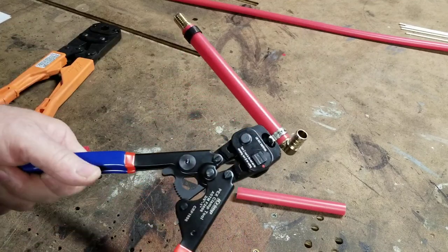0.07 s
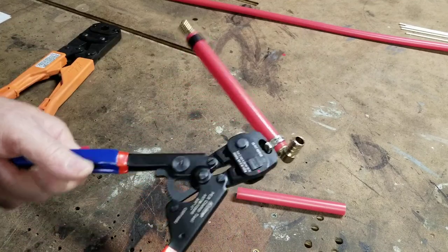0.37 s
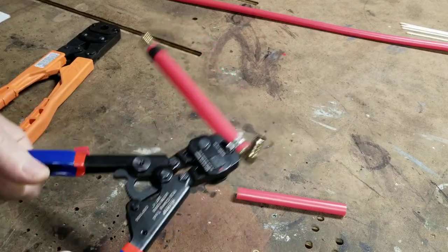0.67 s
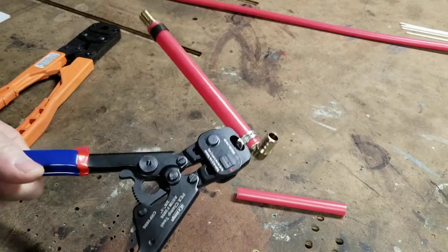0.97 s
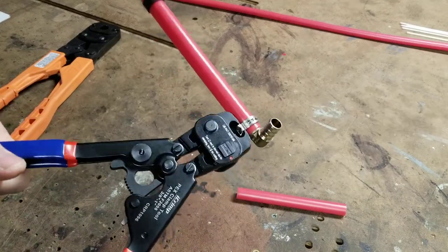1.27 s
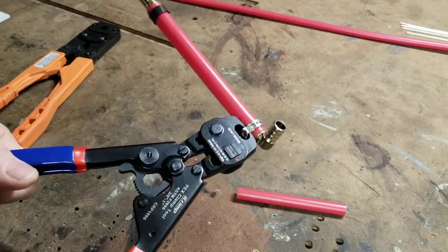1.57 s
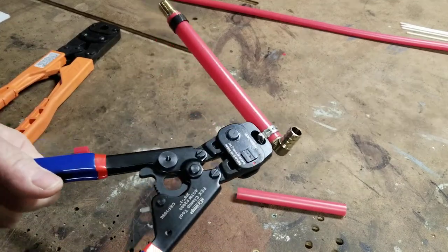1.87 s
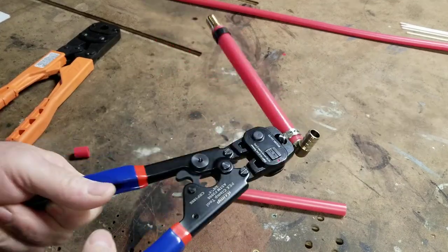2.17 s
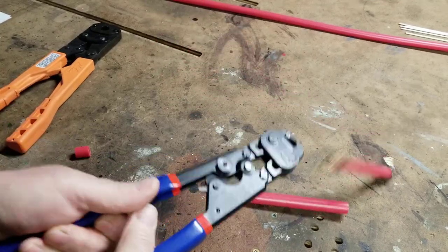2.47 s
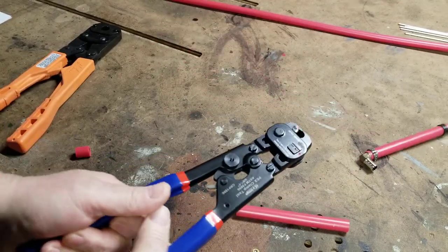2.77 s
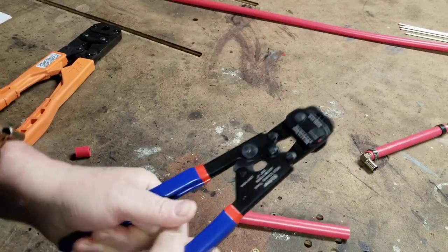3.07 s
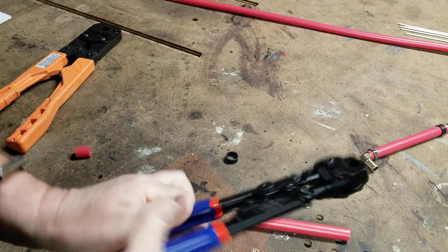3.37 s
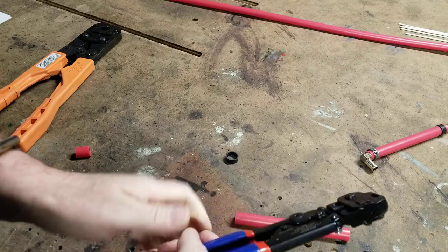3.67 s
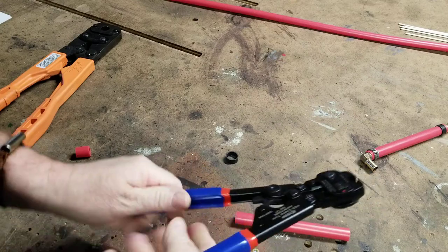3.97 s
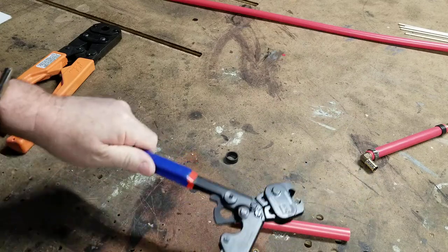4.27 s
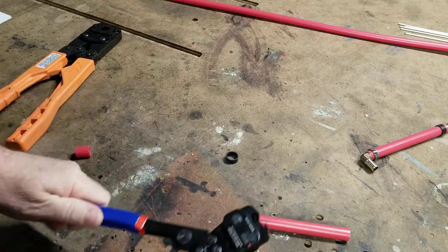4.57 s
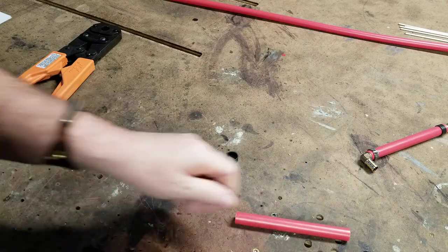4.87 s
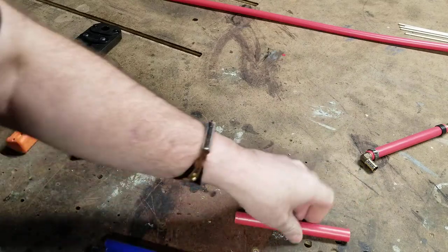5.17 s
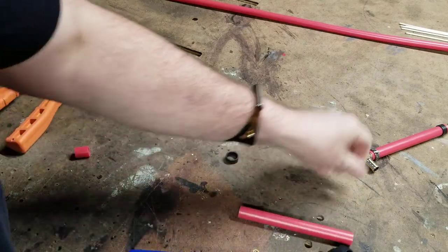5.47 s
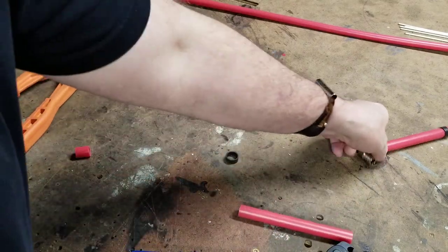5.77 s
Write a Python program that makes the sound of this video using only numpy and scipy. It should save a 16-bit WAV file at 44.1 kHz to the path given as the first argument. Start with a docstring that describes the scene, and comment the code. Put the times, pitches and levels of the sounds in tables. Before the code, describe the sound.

A crimp tool snaps sharply, a plastic pipe drops and bounces on a wooden workbench, then the handles ratchet open.

```python
"""A plastic pipe scrapes on a wooden workbench, close to a stereo pair of microphones in a small workshop.
A crimp tool's links tick; its pawl and jaws snap, ringing the frame, and a steel ring tears off the pipe.
The pipe drops and bounces, sounding the bench top and its own brass fitting. The handles ratchet open,
the tool is put down, and a hand knocks on the bench and takes up the pipe. Nearby walls and shelves
echo each contact over quiet room tone."""
import sys
import numpy as np
from scipy import signal
from scipy.fft import rfft, irfft, next_fast_len
from scipy.io import wavfile

SR = 44100
rng = np.random.default_rng(int(sys.argv[2]) if len(sys.argv) > 2 else 0)


def materialize(psi):
    """Save the field psi as 16-bit PCM at rate SR to the path in sys.argv[1].

    A 1-D psi becomes a single channel; in a 2-D psi each row is a channel.
    """
    bounded = np.clip(np.atleast_2d(psi).T, -1, 1)
    quanta = np.round(bounded * 32767).astype(np.int16)
    wavfile.write(sys.argv[1], SR, quanta)


N = 266011
TIME = np.arange(N) / SR

# Room tone, spectra of still air and low rumble: freq_hz, level_db
AIR_COLOUR = [(15, -38.5), (25, -19.5), (53, -1), (80, -2), (887, -21), (1610, -23.5), (3250, -31),
              (4490, -25.5), (5430, -33.5), (7310, -29), (8590, -39.5), (13200, -26.5), (16000, -35.5)]
RUMBLE_COLOUR = [(20, -10), (40, -6), (62, 8.5), (100, 1.5), (170, -16), (300, -33.5), (800, -43),
                 (3000, -68)]
# Rise and fall of the rumble: time_s, relative_db
RUMBLE_LEVEL = [(0.0, -60), (0.54, -60.5), (2.77, -64), (3.06, -73.5), (4.64, -69), (5.17, -64.5),
                (5.39, -50.5), (6.03, -65.5)]
# Hands, pipe and handles sliding: peak_s, level_db, half_length_s
SWISHES = [(0.458, -50.5, .085), (0.655, -66.5, 0.26), (1.1, -70, 1.4), (0.919, -53.5, 0.081),
           (1.284, -56, 0.042), (1.441, -58, 0.03), (1.608, -63.5, 0.046), (1.786, -61, 0.033),
           (1.922, -60, 0.06), (3.087, -60, 0.14), (3.339, -61.5, 0.077), (3.498, -70.5, 0.074),
           (3.876, -61, 0.1), (5.236, -70.5, 0.23), (5.7, -63.5, 0.16)]
# Spectrum of that sliding: freq_hz, level_db
RUB_COLOUR = [(200, -11.5), (1000, -10.5), (1600, 0.5), (2800, -11), (5000, 0.5), (7300, 3), (9000, -6.5),
              (12500, 5), (16000, 6)]
# Plastic and steel scraping: start_s, length_s, level_db, from_hz, to_hz
SCRAPES = [(0.395, 0.052, -46.5, 1550, 1124), (0.465, 0.24, -64.5, 1130, 1480),
           (0.573, .012, -63, 4320, 4430), (0.738, 0.23, -70.5, 1680, 1795), (0.93, 0.056, -58, 1700, 1850),
           (1.77, 0.057, -68.5, 1500, 1486), (5.71, 0.052, -56, 1400, 1430),
           (5.953, 0.12, -76.5, 2900, 2870)]
# Ticks of the loose linkage: start_s, relative_db, length_s, tilt_db_per_octave
TICKS = [(0.401, -25, 0.0017, -5), (0.694, -17.5, 0.0015, 3.5), (3.181, -26, 0.0014, -2.5),
         (3.266, -23.5, 0.01, -1.5), (3.279, -24, 0.0033, -3.5), (3.4875, -12, 0.00043, 0),
         (3.6135, -12, 0.0068, 0.5), (3.63, -28, 0.0058, -2.5), (4.104, -4.5, 0.0046, -1),
         (4.206, -17, 0.0025, 11), (4.357, -1, 0.006, 2.5), (4.38, -11.5, .002, 12),
         (4.4515, -8.5, 0.0046, 1.5), (4.515, -20.5, 0.0019, -1)]
# Spectrum of a tick before its tilt: freq_hz, level_db
TICK_COLOUR = [(100, -12), (1200, -16), (3000, -2), (7000, 7.5), (8800, 1.5), (12000, 3.5), (16000, -0.5)]
# Resonances of the links: pitch_hz, level_db, t60_s
LINK_MODES = [(2900, 3, .006), (4750, 0, .005), (6550, -2, .006)]
# Pipe, tool and hand striking the bench: start_s, level_db, contact_hz, treble_db_per_octave, room_db
BLOWS = [(0.416, -12, 1320, 0, -3), (.457, -23, 754, -4, -14), (0.5705, -27.5, 1400, -8, -28),
         (.694, -29, 1430, -20, -4), (.835, -30, 513, -2.5, -10), (2.098, -29.5, 1770, -13, -9),
         (2.448, 2, 1040, 0, 4.5), (2.4524, 10, 239, -3, -10), (2.666, -3.5, 700, -4, -2.5),
         (2.7174, 7, 305, 3.5, 4), (2.7256, 11.5, 1140, -20.5, -2.5), (2.798, -2, 1283, -2, -2.5),
         (4.107, -14.5, 850, 5, -15), (4.8247, -16.5, 1403, -11, -13), (4.8255, -5.5, 290, -6.5, 0.5),
         (5.177, -8, 156.3, -3.5, -21.5), (5.18, -33, 1915, -16.5, -6), (5.188, -6.5, 98, -3, -4.5),
         (5.227, -7, 150, -3.5, 0), (5.231, -28, 2000, -14, -13), (5.29, -0.5, 62, -9, -10),
         (5.317, -24, 1850, -4, -4.5), (5.326, -6.5, 170, -3, -2.5), (5.559, -7, 1520, -13.5, -11),
         (5.5599, 6, 354, -7, 2), (5.795, -20, 1214, -21, -4), (5.951, -26.5, 980, -13, 4)]
# Main resonances of the bench top: pitch_hz, level_db, t60_s
BENCH_MODES = [(62, -7, 0.39), (95.7, -9.5, 0.17), (111, -1, 0.15), (190, -10.5, 0.1), (276.4, -1, 0.33),
               (283.6, 1, 0.12), (379, -17.5, 0.032), (416, -9.5, 0.13), (724, -11.5, .04),
               (986, -10, 0.028), (1630, -28, 0.063)]
# Spectrum of its many small modes: freq_hz, level_db
BENCH_COLOUR = [(35, -16), (70, 3.5), (130, 1), (265, 2.5), (420, -1.5), (750, -8), (1100, -11),
                (1700, -11.5), (2600, -17.5), (4000, -25), (5500, -22), (7400, -18), (9000, -28),
                (16000, -23)]
# Their decay: freq_hz, t60_s
BENCH_T60 = [(100, 0.68), (400, 0.17), (1500, 0.025), (5000, 0.038), (14000, 0.022)]
# Spectrum of the workshop's echoes: freq_hz, level_db
ROOM_COLOUR = [(50, 0), (200, -8), (600, -3), (3000, 2.5), (5000, 3.5), (6700, -3), (9000, 1), (12000, 3.5),
               (16000, -3.5)]
# Their decay: freq_hz, t60_s
ROOM_T60 = [(100, 0.21), (400, 0.69), (1200, 0.39), (3000, 0.48), (7000, 0.42), (14000, 0.19)]
# Snaps of pawl and jaws: start_s, relative_db
SNAPS = [(1.9244, 7), (1.946, 6), (1.9631, 4.5), (1.9839, 8), (2.2105, 3.5), (2.2332, 6), (2.2424, 6),
         (2.2471, 4), (3.9189, 3.5), (3.9373, 1.5), (3.9576, -5.5), (3.9847, -4), (4.0111, 3), (4.0277, 4),
         (4.0395, -1.5), (4.0487, -6), (4.0575, -6), (4.0645, -8.5), (4.3567, -15)]
# Handle strokes (jaws bite, jaws slip, ring tears, handles open, loose handle hits its stop):
# start_s, frame_hz, frame_db, steel_db, recoil_db, relative_room_db
STROKES = [(1.9, 2380, -10, -10, -19.5, -1), (2.2, 2413, -7.5, -10.5, -21, 2),
           (2.24, 2400, -7, -20, -16.5, 5), (3.9, 3200, -6, -31.5, -15, -1.5),
           (4.3, 2930, -2, -22, -34, -0.5)]
# Spectrum of a snap's crack: freq_hz, level_db
STEEL_COLOUR = [(100, -24.5), (400, -26.5), (1200, -28), (2200, -11.5), (4400, 0.5), (5400, -2.5),
                (6200, 4), (7100, 6), (8300, -8), (10500, -3.5), (12200, -1.5), (14000, 0), (16000, -5.5)]
# Strikes on the brass fitting at the pipe's end: start_s, level_db
CLINKS = [(2.4478, 3), (2.7175, -6.5)]
# Resonances of the fitting: pitch_hz, level_db, t60_s
FITTING_MODES = [(1536, -0.5, 0.0082), (2100, -11, 0.02), (3900, -5.5, 0.012), (4700, -0.5, 0.0091),
                 (6316, -12.5, .008)]
# Likeness of diffuse sound at the two microphones: freq_hz, correlation
MIC_LIKENESS = [(60, .93), (280, 0.96), (600, 0.54), (1200, 0), (16000, 0.024)]
# The right microphone against the left: freq_hz, gain_db
RIGHT_MIC_COLOUR = [(100, -2.5), (300, -4.5), (650, -6.5), (1300, -5.5), (2800, 0), (5500, -3), (9500, -1),
                    (14000, -0.5)]


def from_db(db):
    """Decibels to gain."""
    return 10 ** (np.asarray(db) / 20)


def unit(x):
    """Scale to an energy of one per channel."""
    return x / np.sqrt(np.sum(x ** 2, axis=-1, keepdims=True) + 1e-20)


def at_hz(points, hz):
    """Read a table on a log-frequency axis."""
    freqs, values = np.transpose(points)
    return np.interp(np.log(np.maximum(hz, 1)), np.log(freqs), values)


def coloured(x, spectrum):
    """Causal (minimum-phase) filter with the given spectrum."""
    n = 2 * next_fast_len(x.shape[-1] * 2 // 3 + 1)
    gain = from_db(at_hz(spectrum, np.fft.rfftfreq(n, 1 / SR)))
    cepstrum = irfft(np.log(gain), n)
    cepstrum[1:n // 2] *= 2
    cepstrum[n // 2 + 1:] = 0
    return irfft(rfft(x, n) * np.exp(rfft(cepstrum)), n)[..., :x.shape[-1]]


def diffuse(size):
    """White noise at both microphones, alike in the bass and unrelated in the treble."""
    n = next_fast_len(size)
    alike = np.clip(at_hz(MIC_LIKENESS, np.fft.rfftfreq(n, 1 / SR)), -1, 1)
    mid, side = rfft(rng.standard_normal((2, n)))
    pair = np.sqrt((1 + alike) / 2) * mid + np.sqrt((1 - alike) / 2) * side * [[1], [-1]]
    return irfft(pair, n)[:, :size]


def steady(spectrum):
    """Coloured stereo noise of rms one."""
    return unit(coloured(diffuse(N), spectrum)) * np.sqrt(N)


def dense_modes(t60_table, size):
    """Countless close modes: stereo noise that dies at its own rate in each octave."""
    t, hz = np.arange(size) / SR, np.fft.rfftfreq(size, 1 / SR)
    noise, out = rfft(diffuse(size)), 0
    centres = np.geomspace(62.5, 16000, 9)
    for centre, pick in zip(centres, np.eye(len(centres))):
        share = np.interp(hz, centres, pick)
        band = irfft(noise * share, size) * from_db(-60 * t / at_hz(t60_table, centre))
        out = out + unit(band) * np.sqrt(share.mean())
    return unit(out)


def mode(hz, t60, size):
    """One decaying sine of unit energy."""
    t = np.arange(size) / SR
    return unit(np.sin(2 * np.pi * hz * t) * from_db(-60 * t / t60))


def crack(length_s, size):
    """Slipping over an edge: a burst of tiny contacts that swells and dies, even in spectrum."""
    t = np.arange(size) / SR / max(length_s, 1e-4)
    swell = t * np.exp(-np.pi * t)
    spectrum = rfft(rng.standard_normal((2, size)) * swell)
    even = irfft(spectrum / (np.abs(spectrum) + 1e-12), size)
    return unit(even * np.sqrt(swell))


def rung(burst, modes):
    """Resonances set ringing by a burst, at unit energy."""
    return unit(signal.fftconvolve(burst, modes[None])[:, :len(modes)])


def stick_slip(spread_db, count):
    """Surfaces catch and let go: a gain that wanders through random values."""
    times = np.linspace(0, TIME[-1], count)
    return from_db(spread_db * np.interp(TIME, times, rng.standard_normal(count)))


def add(track, start_s, sound):
    """Mix a sound in at a time."""
    i = round(start_s * SR)
    track[:, i:i + sound.shape[-1]] += sound[..., :N - i]


def placed(x, left_db, lag_s=0):
    """A source to the left is louder in the left microphone and may reach the right one later."""
    right = np.interp(TIME - lag_s, TIME, x[1])
    return np.array([x[0] * from_db(left_db / 2), right * from_db(-left_db / 2)])


def room_tone(air_db=-69.5):
    """Still air and a low rumble that slowly sinks and swells."""
    rumble_db = 1.5 + np.interp(TIME, *np.transpose(RUMBLE_LEVEL))
    rumble = from_db(rumble_db) * steady(RUMBLE_COLOUR)
    return placed(rumble, left_db=0.5) + from_db(air_db) * steady(AIR_COLOUR)


def rubbing():
    """Left of centre, a grainy hiss of skin and plastic sliding swells with each small move."""
    moves = sum(from_db(db) * np.exp(-((TIME - peak_s) / half_s) ** 2) for peak_s, db, half_s in SWISHES)
    return placed(moves * stick_slip(1.9, count=2400) * steady(RUB_COLOUR), left_db=6.5)


def scraping(width_hz=300, attack_s=0.009, release_s=0.023, sag_db=-7, grit_db=-3.5):
    """Well to the left, each scrape excites broad grit and a resonance that glides with the contact."""
    lowpass = signal.butter(2, width_hz / 2, fs=SR, output="sos")
    narrow = unit(signal.sosfilt(lowpass, rng.standard_normal((2, N))))
    grit = steady([(150, -7), (500, -7), (1500, 14), (3000, 11.5), (7000, 16), (16000, -23)])
    out = 0
    for start_s, length_s, level_db, from_hz, to_hz in SCRAPES:
        age = TIME - start_s
        progress = np.clip(age / length_s, 0, 1)
        pressed = np.clip(age / attack_s, 0, 1) * np.clip(1 - (age - length_s) / release_s, 0, 1)
        gain = pressed * from_db(level_db + sag_db * progress)  # the pressure eases
        hz = from_hz + (to_hz - from_hz) * progress
        resonance = narrow * np.cos(2 * np.pi * np.cumsum(hz) / SR) * np.sqrt(2 * N)
        out = out + gain * (resonance + from_db(grit_db) * grit)
    return placed(out * stick_slip(5.2, count=900), left_db=9.5)


def linkage_ticks(room_db=-8.5, size=4096):
    """Loose links and the pawl tick as the tool moves; duller contacts move more metal and ring more."""
    direct = np.zeros((2, N))
    for start_s, level_db, length_s, tilt in TICKS:
        colour = [(hz, db + tilt * np.log2(hz / 1000)) for hz, db in TICK_COLOUR]
        burst = crack(length_s, size)
        # the resonances shift as the links change position
        links = sum(from_db(db) * mode(hz * rng.uniform(0.92, 1.08), t60, size)
                    for hz, db, t60 in LINK_MODES)
        ringing = from_db(-10 - 2.5 * tilt) * rung(burst, links)
        tick = unit(unit(coloured(burst, colour)) + ringing)
        add(direct, start_s, from_db(level_db - 3) * tick)
    return placed(direct, left_db=2), from_db(room_db) * direct


def bench_blows(bass_db_per_octave=-6, size=12288):
    """Blows ring the bench top, just right of centre; soft, long contacts give bass, hard edges treble."""
    direct, to_room = np.zeros((2, 2, N))
    # the room receives all directions at once, so the small modes blend into a smooth spectrum
    blended = unit(coloured(signal.unit_impulse(size), BENCH_COLOUR))
    for start_s, level_db, contact_hz, treble_slope, room_db in BLOWS:
        main = unit(sum(from_db(db + rng.normal(0, 1)) * (-1) ** k * mode(hz, t60, size)
                        for k, (hz, db, t60) in enumerate(BENCH_MODES)))
        small = dense_modes(BENCH_T60, size) + from_db(-6) * crack(0.0016, size)[0]
        small = unit(coloured(small, BENCH_COLOUR))
        contact = [(contact_hz / 16, 4 * bass_db_per_octave), (contact_hz, 0),
                   (6000, treble_slope * np.log2(6000 / contact_hz))]
        # the contact favours one resonance at its own pitch, for about ten cycles
        favoured = from_db(-5) * mode(contact_hz, 10 / contact_hz, size)
        for track, body, path_db in [(direct, small, 0), (to_room, blended, room_db)]:
            wood = unit(coloured(body + from_db(-8) * main, contact))
            add(track, start_s, from_db(level_db + path_db) * unit(wood + favoured))
    return placed(direct, left_db=-2.5), to_room


def workshop_echoes(to_room, first_echo_s=0.0042, build_up_s=0.0046, shift_hz=11, patterns=3, size=SR):
    """Echoes from nearby shelves and walls thicken and die, the top treble first; a faint tail lingers."""
    t, out = np.arange(size) / SR, 0
    onset = np.clip((t - first_echo_s) / build_up_s, 0, 1) + 0.18
    tail = from_db(-16.5) * dense_modes([(200, 3.9), (1200, 1.3), (5000, 0.66), (14000, 0.5)], size)
    for k in range(patterns):
        # each contact radiates its own way, so the echo pattern keeps changing, at constant power
        share = np.sqrt(2 / patterns) * np.cos(np.pi * (shift_hz * TIME + k / patterns))
        response = coloured(unit((dense_modes(ROOM_T60, size) + tail) * onset), ROOM_COLOUR)
        out = out + signal.fftconvolve(to_room[:1] * share, response, axes=1)[:, :N]
    return placed(out, left_db=-0.6)


def ratchet_snaps(frame_cycles=17, jaw_hz=6965, jaw_db=-5.5, size=6144):
    """Left of centre, each snap of pawl or jaws cracks, rings the steel frame and jolts the whole tool."""
    direct, to_room, jolt = np.zeros((3, 2, N))
    jaw = from_db(jaw_db) * mode(jaw_hz, t60=0.01, size=size)
    recoil = 0.5 * mode(210, 0.0025, size) - 0.73 * mode(66, 0.073, size)
    for start_s, level_db in SNAPS:
        stroke = [row for row in STROKES if row[0] <= start_s + 0.004][-1]
        _, frame_hz, frame_db, steel_db, recoil_db, room_db = stroke
        burst = crack(0.0023, size)
        frame_modes = mode(frame_hz, frame_cycles / frame_hz, size) + jaw
        frame = from_db(frame_db - 1) * rung(burst, frame_modes)
        # close modes of the hardened jaws beat, differently at every snap
        steel = unit(sum(rng.uniform(0.5, 1) * mode(hz, t60, size)
                         for hz, t60 in [(12110, 0.03), (12215, 0.046), (12320, 0.04), (12570, 0.0087)]))
        snap = unit(coloured(burst, STEEL_COLOUR)) + frame + from_db(steel_db) * steel
        add(direct, start_s, from_db(level_db - 0.5) * snap)
        add(to_room, start_s, from_db(level_db + room_db - 6.5) * snap)
        add(jolt, start_s, from_db(level_db + recoil_db) * recoil)
    jolt = signal.sosfilt(signal.butter(1, 300, fs=SR, output="sos"), jolt)
    return placed(direct, left_db=2, lag_s=0.00069) + placed(jolt, left_db=16.5), to_room


def fitting_clinks(room_db=-13, size=4096):
    """The brass fitting clinks briefly as it lands, damped by the pipe around it."""
    direct = np.zeros((2, N))
    brass = sum(from_db(db) * mode(hz, t60, size) for hz, db, t60 in FITTING_MODES)
    for start_s, level_db in CLINKS:
        add(direct, start_s, from_db(level_db) * rung(crack(0.0018, size), brass))
    return placed(direct, left_db=0.5), from_db(room_db) * direct


def scene():
    """Tool, pipe and bench close to the microphones, with the workshop around them."""
    direct, to_room = np.sum([ratchet_snaps(), linkage_ticks(), bench_blows(), fitting_clinks()], axis=0)
    return direct + workshop_echoes(to_room) + rubbing() + scraping() + room_tone()


def record(dry, cutoff_hz=15900):
    """The two microphones differ in colour; the top of the treble is cut steeply."""
    pair = np.array([dry[0], coloured(dry[1], RIGHT_MIC_COLOUR)])
    return signal.sosfilt(signal.ellip(10, 0.1, 90, cutoff_hz, fs=SR, output="sos"), pair)


dry = scene()
out = record(dry)
materialize(out)
```